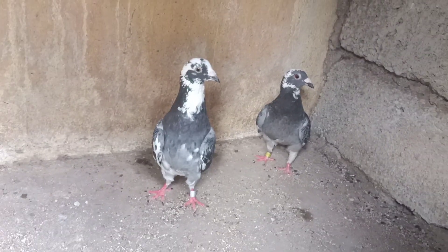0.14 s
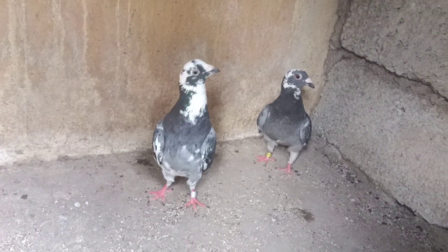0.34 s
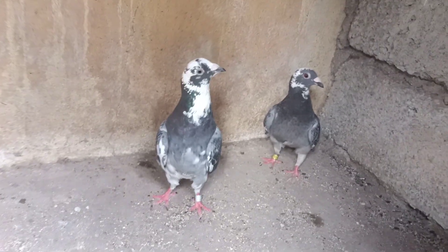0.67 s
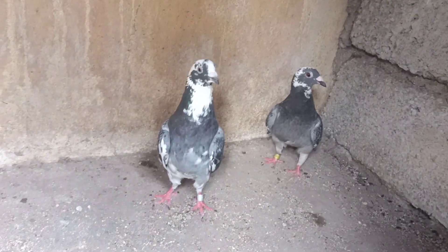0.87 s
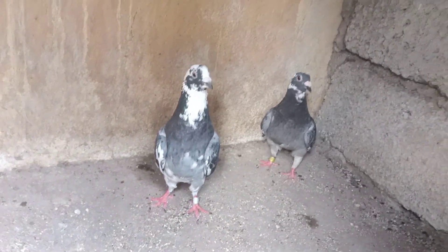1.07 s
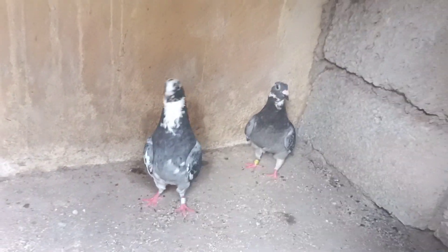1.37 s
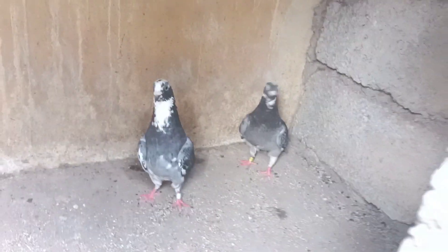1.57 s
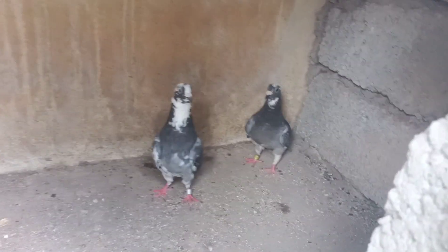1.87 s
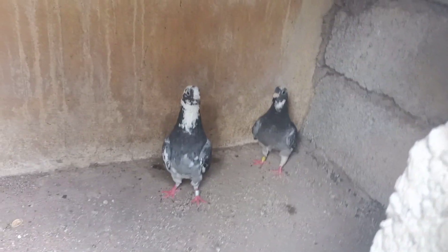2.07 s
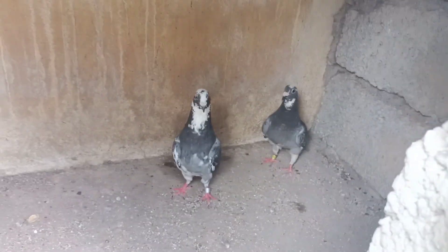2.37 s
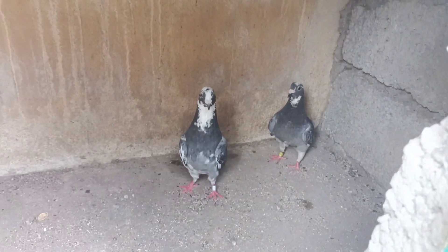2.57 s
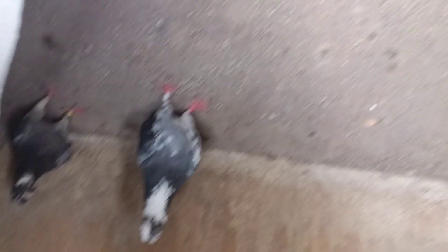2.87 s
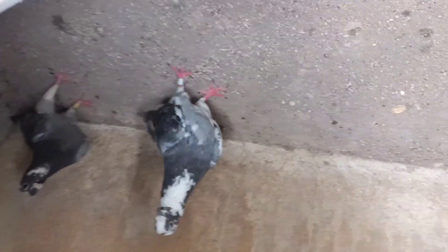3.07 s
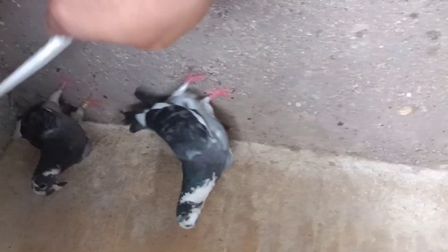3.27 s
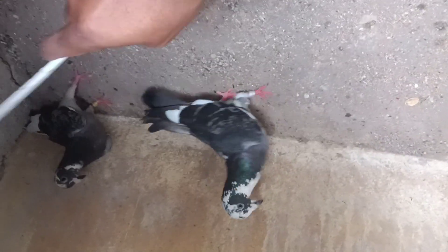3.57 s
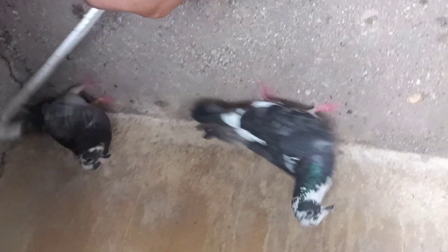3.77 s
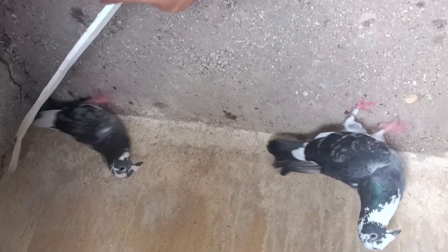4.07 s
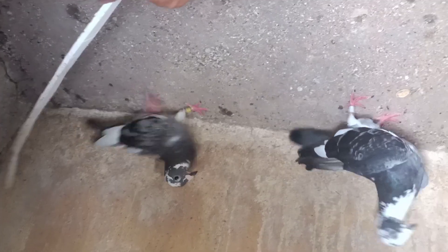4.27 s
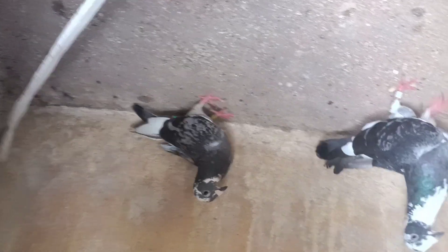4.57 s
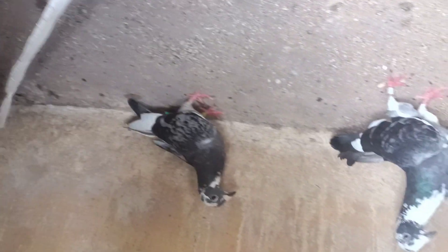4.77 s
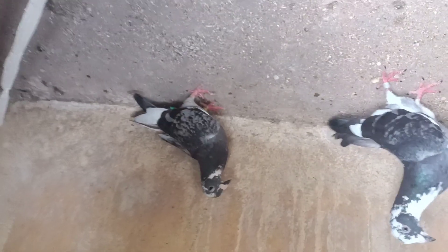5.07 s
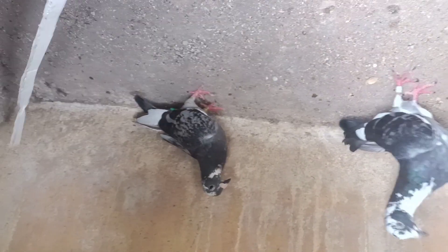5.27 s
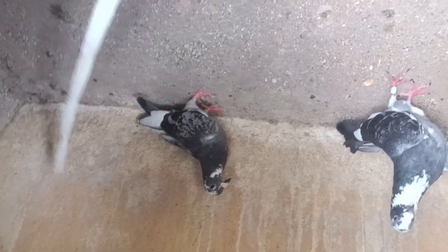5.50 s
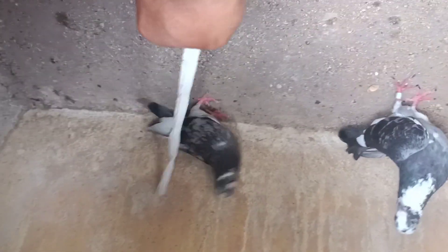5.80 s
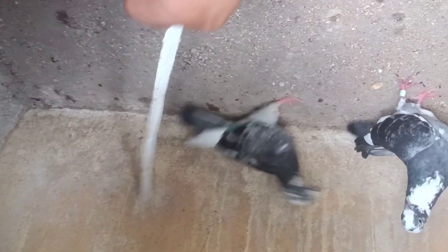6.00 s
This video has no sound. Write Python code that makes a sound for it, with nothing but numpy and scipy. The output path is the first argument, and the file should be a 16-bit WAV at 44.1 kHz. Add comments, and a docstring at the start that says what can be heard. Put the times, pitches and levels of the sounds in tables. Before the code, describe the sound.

Pigeons coo close by in a small, resonant concrete loft, in soft, low phrases that break into a throbbing trill and continue for all six seconds. Other birds add short, higher hoarse notes and a few grunts, clearest around 1.7 seconds. Far traffic rumbles faintly, and a very faint electric buzz lasts until about 2.5 seconds, ending just after some soft low thuds of microphone handling. The sound then shifts sides, and feet and feathers begin scuffing the gritty floor. After a light tap at 3.2 seconds, a rod knocks sharply on a hollow board at 3.5 seconds, the loudest moment, followed by a burst of rustling. Scrapes and small ticks continue among the coos. From 5.2 seconds the rustling picks up again, with a stronger hoarse note and two lighter knocks around 5.6 and 5.8 seconds.

```python
"""Pigeons in a concrete loft

Soft two-partial coos break into a throbbing trill and ring the small loft's air modes; other birds add
hoarse notes and grunts. Feet and feathers scuff the gritty floor, a rod knocks hard and lightly on a
hollow board, far traffic rumbles, something electric buzzes faintly. Two microphone ports each colour
the sound. Low thuds lead up to a scene cut at 2.56 s, where the sound changes sides and the buzz stops."""
import sys
import numpy as np
from scipy import signal
from scipy.fft import rfft, irfft
from scipy.io import wavfile

SR = 44100
rng = np.random.default_rng(int(sys.argv[2]) if len(sys.argv) > 2 else 0)


def transcribe(u):
    """Save the signal u as a 16-bit wav file named by the first command-line argument.

    u: samples, shape (n,) or (channels, n), limited to [-1, 1]; the rate is SR.
    q: integer samples, one column per channel.
    """
    v = np.clip(np.atleast_2d(u).T, -1, 1)
    q = np.round(v * 32767).astype(np.int16)
    wavfile.write(sys.argv[1], SR, q)


N = 270774
CUT_S = 2.56   # the scene cuts: the sound changes sides and the buzz stops

# The coo's syllables. Each row: start and length in seconds, first and last pitch in Hz, first and last
# level in dB, octave against the fundamental in dB, voice (clear, husky or trill).
SYLLABLES = [(0.001, 0.019, 287, 261, -49.5, -46, -3, "husky"),
             (0.016, 0.13, 252, 255.5, -47, -45, -14.5, "clear"),
             (0.169, 0.12, 284.7, 255, -42.5, -52, -9.5, "clear"),
             (0.335, 0.24, 225.6, 219.6, -72, -86, -28, "trill"),
             (0.557, 0.12, 244.4, 287, -60, -39, -7, "husky"),
             (0.706, 0.13, 325.5, 295.8, -45.5, -46.5, -2.5, "trill"),
             (0.823, 0.075, 302, 274.6, -46, -57, 0.5, "husky"),
             (.905, 0.074, 261.7, 267.9, -45.5, -37, -11, "clear"),
             (0.996, 0.1397, 278, 296.9, -41.5, -43, -2, "clear"),
             (1.147, 0.072, 252.4, 303.2, -57, -57.5, 0.5, "trill"),
             (1.272, 0.08, 230, 198.6, -66, -52.5, -32, "trill"),
             (1.398, 0.073, 213, 232.8, -54, -52, -12, "husky"),
             (1.492, .075, 289.4, 310, -50, -44, 1, "husky"),
             (1.575, .17, 300, 300, -42.5, -49, -1.5, "trill"),
             (1.758, 0.08, 261.8, 265, -43, -33.5, -11.5, "clear"),
             (1.857, 0.1, 292.6, 313.5, -47, -41, -10, "clear"),
             (1.974, 0.085, 276.7, 288, -43, -42, 6, "clear"),
             (2.062, 0.089, 297.8, 286.1, -42, -47, 2.5, "husky"),
             (2.193, 0.058, 256, 250.3, -48, -46, -11.5, "trill"),
             (2.267, 0.067, 300.2, 303.6, -46, -53, -1.5, "husky"),
             (2.343, 0.09, 323, 288.6, -45.5, -47, 1, "husky"),
             (2.526, 0.028, 296, 297.4, -49.5, -72, -5, "trill"),
             (2.761, 0.14, 250.5, 289.2, -49.5, -47.5, -26, "husky"),
             (2.975, 0.21, 254.4, 254.3, -60.5, -59, -13, "husky"),
             (3.193, 0.031, 209.9, 214, -48, -44, -16, "husky"),
             (3.249, 0.14, 281.4, 238.7, -33.5, -57.5, -22, "husky"),
             (3.599, 0.037, 256.6, 289.3, -45.5, -65, -26, "husky"),
             (3.987, 0.1, 202.1, 207.2, -55.5, -55, -14, "husky"),
             (4.111, 0.12, 266.3, 291.5, -52, -48.5, -18, "husky"),
             (4.293, 0.04, 269.3, 254, -47, -56, -12.5, "clear"),
             (4.328, 0.096, 264.5, 275.7, -37, -37, -19, "clear"),
             (4.436, 0.05, 263, 261.6, -38, -41.5, -13.5, "clear"),
             (4.527, 0.092, 261.8, 265.6, -46, -46, -20, "husky"),
             (4.626, 0.15, 204.4, 207, -52, -50, -25, "husky"),
             (4.788, 0.097, 232.3, 292, -54, -43, -14, "husky"),
             (4.902, .11, 294.6, 317, -49, -52.5, -4.5, "trill"),
             (5.019, 0.18, 255.4, 243.5, -51.5, -65, -42, "trill"),
             (5.21, 0.077, 249, 276.7, -55.5, -48, -7, "husky"),
             (5.336, 0.12, 262.7, 271.3, -49.5, -51, -21, "husky"),
             (5.46, .11, 263, 270, -47.5, -44, -23, "husky"),
             (5.576, 0.097, 260.2, 266.7, -41, -36, -22, "husky"),
             (5.69, 0.2, 266.7, 248.7, -41, -50.5, -18, "husky"),
             (5.929, 0.12, 212.6, 241.4, -52, -56, -12, "clear"),
             (6.056, 0.073, 249.5, 265.5, -40.5, -53.5, -18.5, "clear")]
# Throb depth of each voice, from 0 for a smooth tone to 1 for separate pulses.
THROB_DEPTH = {"clear": .16, "husky": .6, "trill": .86}


def coo():
    """A near-sine, its octave and a low strand; in the trill each puff bends the pitch of a rough tone."""
    waver, trill_bend, hoarseness = .008, .11, .33
    strand_ratio, strand_db = .88, -11
    octave_steady = .35   # share of the octave that holds through the throb
    gain, hz, octave_db, depth = phrase()
    puffs, swing = throb(depth)
    phase = 2 * np.pi * np.cumsum(hz * (1 + waver * drift(58) + trill_bend * depth * swing)) / SR
    rough = [1 + hoarseness * depth * (drift(59) + 1j * drift(72)) for _ in range(2)]
    fundamental = rough[0] * np.exp(1j * phase)
    octave = amp(octave_db + 2 * drift(20)) * rough[1] * np.exp(2j * phase)
    strand = amp(strand_db) * depth * drift(20) * np.exp(1j * strand_ratio * phase)
    swell = np.hypot(np.sqrt(2) * gain * puffs, accents())
    held = octave_steady * np.sqrt(2) * gain + (1 - octave_steady) * swell
    voice = (swell * (fundamental + strand) + held * octave).real
    voice /= np.sqrt(1 + 2 * (hoarseness * depth) ** 2)   # roughness adds no loudness
    return butter(voice, 6, 700, "low")   # the closed beak muffles the tone


def phrase():
    """Gain, pitch, octave level and throb depth: each syllable glides in an arch, its octave growing."""
    # Share by which each voice's pitch bulges mid-syllable.
    arch = {"clear": .02, "husky": .03, "trill": .035}
    attack_s, fade_db_per_s, octave_growth_db = .023, 545.5, 3.5
    gain, knots = np.full(N, amp(-74)), []   # a faint steady murmur of distant pigeons under the coos
    for start, length, hz, end_hz, db, end_db, octave_db, voice in SYLLABLES:
        for part in np.linspace(0, 1, 5):
            pitch = (hz + part * (end_hz - hz)) * (1 + arch[voice] * np.sin(np.pi * part))
            grown_db = octave_db + octave_growth_db * (part - .5)
            knots.append((start + part * length, pitch, grown_db, THROB_DEPTH[voice]))
        at = round(start * SR)
        n = np.arange(at, min(at + SR // 2, N))
        age = n / SR - start
        edges = np.clip(age / attack_s, 0, 1) * amp(-fade_db_per_s * np.maximum(age - length, 0))
        gain[n] = np.maximum(gain[n], edges * amp(np.interp(age, [0, length], [db, end_db])))
    return gain, *in_time(sorted(knots))


def throb(depth, puffs_per_s=30, unevenness=.3):
    """Puffs of air from the crop, uneven in spacing and strength: their gain and their pitch swing."""
    cycles = np.cumsum(puffs_per_s * np.exp(unevenness * drift(9.64))) / SR
    strength = amp(1.5 * rng.standard_normal(600))[cycles.astype(int) % 600]
    puffs = strength * np.sin(np.pi * cycles) ** 2
    return 1 - depth + depth * rms_one(puffs), np.sin(2 * np.pi * cycles)


def accents(smooth_puff_s=.055, pulsed_puff_s=.026):
    """Strong puffs beat evenly through each syllable: rounded swells, shorter the deeper the throb."""
    # Seconds between strong puffs in each voice.
    beat_s = {"clear": .075, "husky": .06, "trill": .066}
    # Lift of a strong puff over its syllable in each voice, in dB.
    lift_db = {"clear": 5, "husky": 4.5, "trill": 7}
    out, uneven_db = np.zeros(N + SR), 2 * rng.standard_normal((len(SYLLABLES), 12))
    for (start, length, _, _, db, end_db, _, voice), chances in zip(SYLLABLES, uneven_db):
        size = round(SR * (smooth_puff_s + (pulsed_puff_s - smooth_puff_s) * THROB_DEPTH[voice]))
        puff = np.sin(np.pi * (np.arange(size) / size) ** .8)   # swells faster than it dies
        for age, chance_db in zip(np.arange(0, length - size / SR / 2, beat_s[voice]), chances):
            at = round((start + age) * SR)
            peak = amp(db + (end_db - db) * age / length + lift_db[voice] + chance_db)
            out[at:at + size] = np.maximum(out[at:at + size], peak * puff)
    return out[:N]


def mate(peak_at=.62, edge_db=-12.5, rise_hz_per_s=50, breath=.36):
    """A second bird's higher notes: short and hoarse, they swell, fade and rise a little."""
    # Each row: start in seconds, length in seconds, pitch in Hz, level at the crest in dB.
    notes = [(0.697, 0.21, 425, -52), (1.49, .14, 419.5, -49.5), (1.685, 0.086, 414, -47.5),
             (2.12, 0.072, 449, -48), (3.178, 0.21, 436, -50), (4.309, 0.14, 439.4, -51.5),
             (5.51, .16, 450, -42), (5.63, .12, 440, -35.5), (5.923, 0.22, 439.7, -60)]
    out, t = np.zeros(N), np.arange(N) / SR
    for start, length, hz, db in notes:
        age = t - start
        swell_db = np.interp(age, [0, peak_at * length, length], [edge_db, 0, edge_db])
        fade = np.clip(np.minimum(age, length - age) / .0073, 0, 1)
        glide = hz + rise_hz_per_s * (age - length / 2)
        out += fade * amp(db + swell_db) * np.sin(2 * np.pi * np.cumsum(glide) / SR + .35 * drift(30))
    return np.sqrt(2) * out * amp(2 * drift(20)) * (1 + breath * drift(60))


def grunts(throat_width_hz=190):
    """A bird further off, beak open: breathy harmonics picked out by a sliding throat resonance."""
    # Each row: start and length in seconds, pitch in Hz, first and last resonance in Hz, level in dB.
    calls = [(.105, .09, 226, 900, 720, -63), (.32, .11, 210, 650, 1150, -64),
             (.455, .065, 200, 760, 900, -63), (.575, .06, 218, 650, 650, -62),
             (1.485, .05, 200, 780, 780, -62), (1.645, .04, 325, 650, 650, -46),
             (1.71, .035, 320, 640, 640, -46), (1.778, .03, 310, 620, 620, -38),
             (5.7, .21, 178, 230, 150, -48)]
    out = np.zeros(N)
    breaths = [1 + .5 * drift(37) for _ in range(6)]
    for start, length, hz, first_hz, last_hz, db in calls:
        n = np.arange(round(start * SR), round((start + length) * SR))
        part = (n - n[0]) / len(n)
        throat_hz = first_hz + part * (last_hz - first_hz)
        swell = amp(db) * np.sin(np.pi * part)
        for k, breath in enumerate(breaths, 1):
            resonance = np.exp(-((k * hz - throat_hz) / throat_width_hz) ** 2)
            out[n] += swell * breath[n] * resonance * np.sin(2 * np.pi * k * hz * n / SR + k * k)
    return np.sqrt(2) * out


def knocks(crack_db=4.5, crack_t60_s=.06):
    """Each blow of the rod rings the hollow board's modes and gives a short crack of noise."""
    # Light blows near the edge favour one region of modes. Each row: start in seconds, level in dB,
    # favoured frequency in Hz, fall away from it in dB per octave.
    blows = [(3.4646, -13.5, 490, 1.5), (3.482, -26.5, 482, 19), (3.195, -34, 680, 14),
             (3.222, -42, 680, 14), (5.627, -37.5, 750, 2), (5.820, -29.5, 1240, 15)]
    # The board's modes. Each row: frequency in Hz, level in dB, ring time to -60 dB in seconds.
    board_modes = [(90, -27, .05), (163, -14, 0.13), (280, -8, 0.09), (452, 0, 0.12), (490, -8, .08),
                   (517, 0, 0.125), (600, -6, 0.06), (700, -2, 0.07), (770, -10, 0.062), (855, -12, 0.09),
                   (934, -6, 0.12), (1047, -8, 0.047), (1364, -6, 0.027), (1670, -8.5, 0.065),
                   (2050, -11, 0.066)]
    starts, blow_db, favoured_hz, fall_db = np.transpose(blows)
    at = np.round(starts * SR).astype(int)
    body, clicks = np.zeros((2, N))
    for k, (hz, db, t60) in enumerate(board_modes):
        clicks[at] = amp(blow_db + db - fall_db * np.abs(np.log2(hz / favoured_hz)))
        body += (-1) ** k * ring(clicks, hz, t60)
    clicks[at] = amp(blow_db - fall_db)
    crack = die_away(clicks, crack_t60_s) * rng.standard_normal((2, N))
    return body, amp(crack_db) * butter(crack, 2, 600, "high")


def rustle(grains_per_s=900, grit_share=.2, tick_rise_s=.0027):
    """Feet and feathers on grit: grainy noise in three bands, swelling at each scuff and tick."""
    # Swelling scuffs. Each row: start in seconds, level in dB, relative level of the dull band in dB,
    # time to fall 60 dB in seconds, favoured frequency in Hz, rise in seconds.
    scuffs = [(0.79, -73, 5, 0.18, 5240, 0.017), (1.07, -64.5, -6, 0.35, 6480, 0.024),
              (1.26, -60.5, -9.5, 0.32, 1991, 0.065), (1.58, -65.5, 3, 0.22, 1141, 0.045),
              (1.70, -67.5, -22, .3, 4625, 0.051), (1.905, -61, -4, 0.35, 5580, 0.04),
              (2.165, -61.5, 4, 0.16, 1104, 0.015), (2.245, -69, -12, 0.13, 5730, .015),
              (2.345, -74, 18, 0.13, 1075, 0.043), (2.66, -54, -53, 0.6, 4450, 0.059),
              (2.882, -59, 3.5, 0.23, 1000, .012), (3.05, -49, -8, 0.52, 5300, 0.018),
              (3.50, -31.5, -11.5, 0.21, 2695, 0.018), (3.565, -40.5, -10, 0.46, 5670, 0.023),
              (3.755, -41.5, -10.5, 0.17, 950, 0.029), (3.865, -48, -20, 0.14, 5710, 0.037),
              (4.065, -45, -16.5, 0.37, 1879, 0.014), (4.395, -59.5, -13, 0.29, 5400, 0.021),
              (4.775, -56, -17, 0.2, 6016, 0.024), (5.225, -40.5, -9.5, 0.37, 5580, 0.03),
              (5.34, -40, -6.5, 0.28, 1302, 0.018), (5.655, -42.5, -70, 0.51, 4502, 0.019),
              (5.99, -46, -21, 0.29, 6330, 0.0071), (6.03, -53, -37, 0.16, 5790, 0.034)]
    # Sharp ticks of claws and rod. Each row reads like a scuff's, without the rise.
    ticks = [(0.943, -66.5, -4.5, 0.27, 5040), (2.0716, -58.5, -3, 0.43, 5910),
             (2.1937, -52, -9, 0.033, 2920), (2.528, -62, 2, 0.16, 2005), (2.558, -58, -26, 0.028, 3010),
             (2.601, -49, -25, 0.12, 3100), (3.1911, -65.5, 4, 0.44, 1004), (3.4016, -46, -87, 0.082, 7000),
             (3.744, -44, -21, 0.15, 5600), (3.8929, -49, -17, 0.099, 2906),
             (3.971, -49.5, -12.5, 0.15, 6010), (4.03, -53, -20, 0.32, 3197),
             (4.1945, -46, -91, 0.14, 6500), (4.3424, -63.5, -9, 0.62, 4660), (4.568, -53, -15, 0.26, 5725),
             (4.7146, -54.5, -6, 0.27, 900), (4.9728, -50.5, -11.5, 0.18, 1217),
             (5.0739, -46, -20, 0.24, 4360), (5.45, -42.5, -18, 0.3, 4600), (5.5227, -44, -4.5, 0.21, 4090),
             (5.606, -45.5, -17, 0.27, 4433), (5.6251, -35, -10.5, 0.29, 4700),
             (5.8172, -35.5, -10.5, 0.061, 4374), (5.848, -40, -18, 0.059, 4750),
             (5.8656, -42.5, -25, 0.11, 5605)]
    # Steady shuffling underneath. Each row: time in seconds, bright level in dB, dull level in dB.
    shuffle = [(0.0, -75, -80), (0.49, -82.5, -84), (1.35, -71.5, -76.5), (2.05, -73.5, -77),
               (2.52, -77, -81), (2.56, -63.5, -80), (2.9, -52, -67.5), (3.26, -60, -74),
               (3.7, -63.5, -81.5), (4.0, -55.5, -68.5), (4.33, -77, -81.5), (5.5, -56, -70),
               (6.14, -66.5, -75)]
    # The airy band's fader. Each row: time in seconds, level against the bright band in dB.
    air_fader = [(0, -7), (2.52, -18.5), (2.58, 4.5), (3.0, -4), (3.45, 2.5), (4.25, 0.5), (4.45, -4),
                 (5.1, -9), (5.3, -5), (5.5, -32), (5.64, 0), (5.85, -6), (6.0, -4)]
    # The colours of the three bands. Each row: frequency in Hz, spectral density in dB.
    bright = [(1800, -15), (2800, -10), (4000, -8), (5300, -1.5), (6200, 5), (7200, -3.5), (9000, -5.5),
              (11000, -9)]
    dull = [(350, -18.5), (600, -6), (900, -2), (1500, -1), (2300, -3.5), (3200, -18.5)]
    airy = [(7000, -7), (9000, -0.5), (12000, 0), (15500, -4.5)]
    bright_db, dull_db = in_time(shuffle)
    events = scuffs + [(*tick, tick_rise_s) for tick in ticks]
    gains = np.sqrt(amp([bright_db, dull_db, bright_db]) ** 2 + strokes(events))
    gains[2] *= amp(in_time(air_fader)[0])
    grains = (rng.random(N) < grains_per_s / SR) * rng.exponential(1, N)
    grit = 1 - grit_share + grit_share * rms_one(signal.lfilter([1], [1, -.98], grains))
    scrape = np.zeros((2, N))
    for gain, spectrum in zip(gains, (bright, dull, airy)):
        flicker = amp(drift(27))
        scrape += gain * flicker * shaped(spectrum, rng.standard_normal((2, N)) * grit)
    return hollows(scrape) + grit * scraped_bands(events)


def strokes(events, dull_slower_s=.012):
    """Power of the bright, dull and airy bands as each scuff or tick swells and dies."""
    power = np.zeros((3, N + SR))
    for start, db, dull_db, t60, _, rise in events:
        at = round(start * SR)
        stroke = swell_and_die(db, t60, rise + np.array([[0], [dull_slower_s], [0]]))
        air_db = -.059 * (dull_db + 9)   # duller strokes carry less air
        power[:, at:at + SR] += (amp([[0], [dull_db], [air_db]]) * stroke) ** 2
    return power[:, :N]


def scraped_bands(events, relative_db=-5.5, relative_width=.09):
    """Each stroke also stirs one narrow band of its own, set by what is scraped."""
    out, white = np.zeros((2, N + SR)), rng.standard_normal((2, N + SR))
    edge, size = 1 + relative_width / 2, SR // 2
    for start, db, dull_db, t60, hz, rise in events:
        at = round(start * SR)
        band = rms_one(butter(white[:, at:at + size], 1, [hz / edge, hz * edge], "band"))
        band_db = db + max(dull_db, 0) + relative_db
        out[:, at:at + size] += band * swell_and_die(band_db, t60, rise)[:size]
    return out[:, :N]


def hollows(x):
    """Small cavities of floor and feathers add faint resonances that come and go."""
    out = x.copy()
    for hz in np.geomspace(900, 4900, 14):
        gain = amp(6.5 * np.clip(drift(13), -2, 1.5) - 33) * hz / 2000
        out += gain * ring(x, hz, t60=36 / hz)
    return out


def loft(x, tail_t60_s=.16, tail_db=-7, own_gain=.4):
    """The concrete room answers: low air modes, a short shared tail and each port's own tail."""
    # Each row: frequency in Hz, bandwidth in Hz, level in dB.
    air_modes = [(160, 8, -19), (212, 12, -2), (262, 16.2, -4), (320, 52, -15.5), (439, 38, -12),
                 (508.5, 19.5, 6.5), (610, 9.4, -12)]
    modes = sum(amp(db) * 2 * np.pi * width / SR * ring(x, hz, np.log(1000) / (np.pi * width))
                for hz, width, db in air_modes)
    t = np.arange(SR // 2) / SR
    tails = rng.standard_normal((3, len(t))) * amp(-60 * t / tail_t60_s) * np.minimum(t / .0006, 1)
    tails /= np.sqrt(np.sum(tails ** 2, axis=1, keepdims=True))
    shared, *own = amp(tail_db) * signal.fftconvolve(x[None], tails)[:, :N]
    return modes, shared, own_gain * np.array(own)


def grip(band_hz=(64.7, 111)):
    """A hand shifts on the microphone casing: lumpy low thuds before the cut, mostly unlike per port."""
    # Each row: time in seconds, level in dB.
    fader = [(1.9, -82), (2.05, -67), (2.3, -47.5), (2.5, -57.5), (2.75, -80), (2.9, -89)]
    shared, *own = butter(rng.standard_normal((3, N)), 2, band_hz, "band")
    return amp(in_time(fader)[0] + 2.5 * drift(4.5)) * rms_one(shared + 2.9 * np.array(own))


def buzz(clicks_per_s=60.53, first_s=.0037, t60_s=.011):
    """A faint electric buzz of regular thin clicks that stops at the cut."""
    clicks = np.zeros(N)
    clicks[(np.arange(first_s, CUT_S, 1 / clicks_per_s) * SR).astype(int)] = 1
    bursts = die_away(clicks * amp(3 * drift(3)), t60_s) * rng.standard_normal(N)
    return amp(-69.5) * butter(bursts, 2, [1500, 7000], "band")


def traffic():
    """Far traffic: a slowly heaving rumble, mostly shared by the ports."""
    # Each row: frequency in Hz, spectral density in dB.
    spectrum = [(18, 0.5), (30, -13.5), (45, 6.5), (65, -3.5), (90, -17.5), (130, -12), (200, -4),
                (350, -15.5), (600, -17), (1000, -35.5)]
    # Each row: time in seconds, level in dB.
    fader = [(0.0, -58.5), (0.96, -55.5), (2.26, -48.5), (2.48, -54), (5.04, -58), (5.99, -49.5)]
    shared, *own = shaped(spectrum, rng.standard_normal((3, N)))
    return amp(in_time(fader)[0] + 2.9 * drift(2.6)) * (.89 * shared + .4 * np.array(own))


def at_ports(x, off_centre=1, side_lag_s=.00038):
    """The left port hears later than the right until the cut, then earlier."""
    n = np.arange(N)
    lag = np.where(n < CUT_S * SR, 1, -1) * off_centre * side_lag_s * SR / 2
    return np.array([np.interp(n - lag, n, x), np.interp(n + lag, n, x)])


def amp(db):
    """dB to gain."""
    return 10 ** (np.asarray(db) / 20)


def rms_one(x):
    """Scale to rms 1."""
    return x / np.sqrt(np.mean(x ** 2) + 1e-20)


def in_time(rows):
    """One curve per column, sample by sample, from rows that begin with a time in seconds."""
    times, *columns = np.transpose(rows)
    return [np.interp(np.arange(N) / SR, times, column) for column in columns]


def drift(hz):
    """Smooth random wander of rms 1."""
    pole = np.exp(-2 * np.pi * hz / SR)
    return rms_one(signal.lfilter([1], [1, -2 * pole, pole * pole], rng.standard_normal(N + SR))[SR:])


def butter(x, order, hz, kind):
    """Low-, high- or band-pass with a flat passband."""
    return signal.sosfilt(signal.butter(order, hz, kind, fs=SR, output="sos"), x)


def colour(x, hz, db):
    """Filter by a dB curve over log frequency, causally (minimum phase)."""
    bins_hz = np.maximum(np.arange(4097) * SR / 8192, 1)
    cepstrum = irfft(np.interp(np.log(bins_hz), np.log(hz), db) * np.log(10) / 20)
    cepstrum[1:4096] *= 2
    cepstrum[4097:] = 0
    return signal.fftconvolve(x, irfft(np.exp(rfft(cepstrum))))[:N]


def shaped(spectrum, noises):
    """Give each noise a spectrum that closes at both ends; rms 1."""
    hz, db = np.transpose(spectrum)
    hz, db = np.r_[hz[0] / 2, hz, hz[-1] * 2], np.r_[db[0] - 40, db, db[-1] - 40]
    return np.array([rms_one(colour(noise, hz, db)) for noise in noises])


def ring(x, hz, t60):
    """A unit click sets a sine of height 1 ringing."""
    pole, step = amp(-60 / (t60 * SR)), 2 * np.pi * hz / SR
    return signal.lfilter([0, np.sin(step)], [1, -2 * pole * np.cos(step), pole * pole], x + 1e-18)


def die_away(clicks, t60):
    """An envelope that jumps at each click and falls 60 dB in t60 seconds."""
    return signal.lfilter([1], [1, -amp(-60 / (t60 * SR))], clicks)


def swell_and_die(db, t60, rise):
    """One second of gain: a rounded swell, then a steady fall."""
    age = np.arange(SR) / SR
    swell = np.sin(np.pi / 2 * np.minimum(age / rise, 1)) ** 2
    return swell * amp(db - 60 * np.maximum(age - rise, 0) / t60)


def scene():
    """Birds and board in the loft, with rustle, handling, buzz and traffic around them."""
    birds = coo() + mate() + grunts()
    body, crack = knocks()
    modes, shared_tail, own_tails = loft(birds)
    _, knock_tail, spread = loft(body + .72 * crack[0])
    spread = butter(spread, 2, 510, "high")   # the lows of a blow's tail are alike at both ports
    blows = at_ports(body + amp(2.5) * knock_tail, off_centre=.32) + amp(12) * spread + crack
    pigeons = at_ports(birds + modes + shared_tail) + own_tails
    return pigeons + blows + buzz() + rustle() + traffic() + grip()


def record(dry, hiss_db=-88, cutoff_hz=16014):
    """Each port colours the sound, the electronics hiss, the top is cut."""
    # Each row: frequency in Hz, left gain in dB, right gain in dB.
    port_colours = [(100, -3.5, -2), (265, 0, 1.5), (1190, -0.5, -0.5), (2400, -3.5, 0), (4360, -8.5, 2.5),
                    (6650, -19, 8), (7040, -18.5, 1), (7770, -6, -3.5), (9800, 1, -24), (10880, -8.5, -19),
                    (12860, -7, -2.5), (15500, -19, -3.5)]
    hz, *port_db = np.transpose(port_colours)
    heard = np.array([colour(x, hz, db) for x, db in zip(dry, port_db)])
    heard += amp(hiss_db) * rng.standard_normal((2, N))
    return signal.sosfilt(signal.cheby2(14, 60, cutoff_hz, fs=SR, output="sos"), heard)


dry = scene()
out = record(dry)
transcribe(out)
```